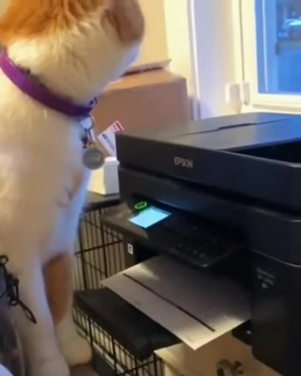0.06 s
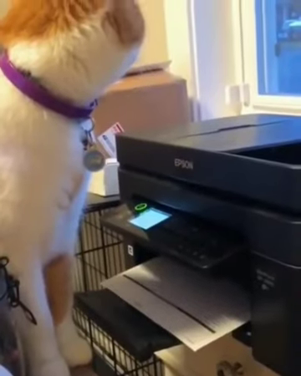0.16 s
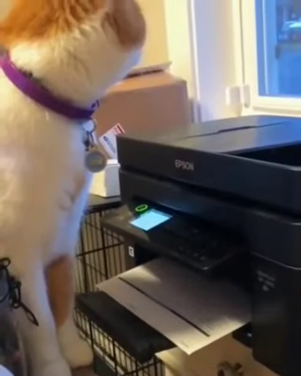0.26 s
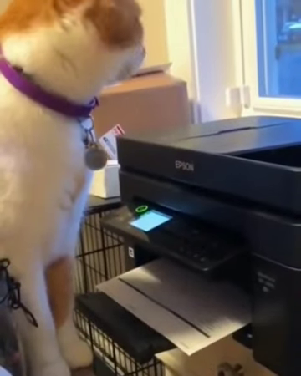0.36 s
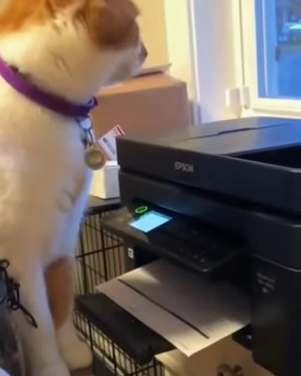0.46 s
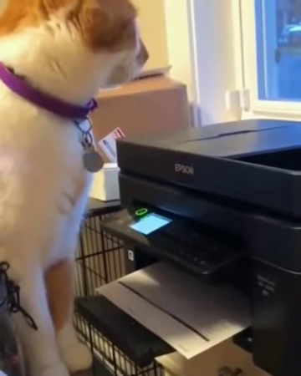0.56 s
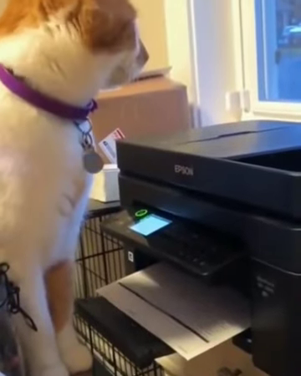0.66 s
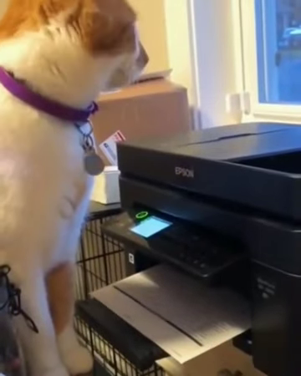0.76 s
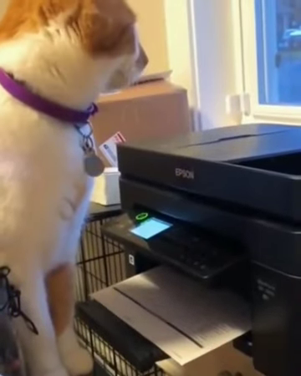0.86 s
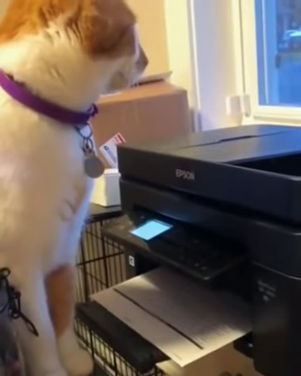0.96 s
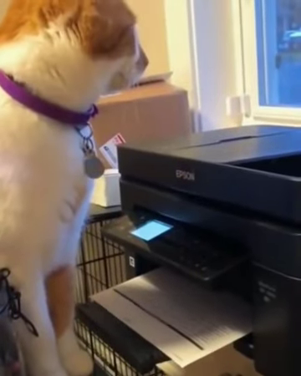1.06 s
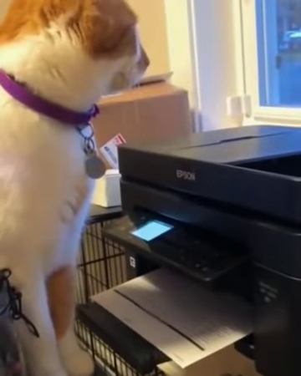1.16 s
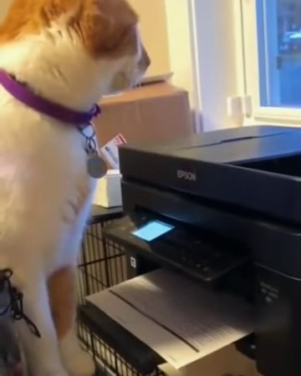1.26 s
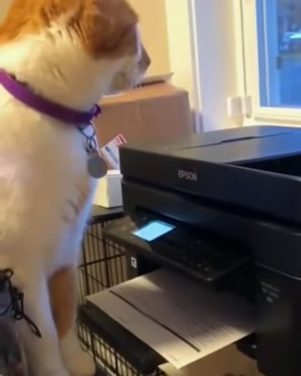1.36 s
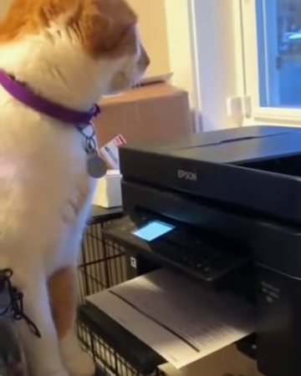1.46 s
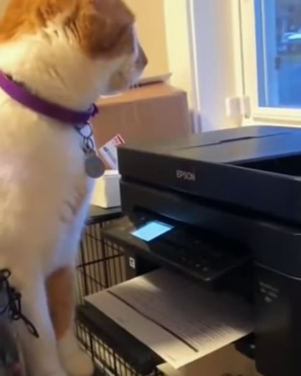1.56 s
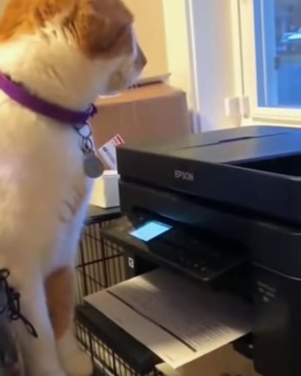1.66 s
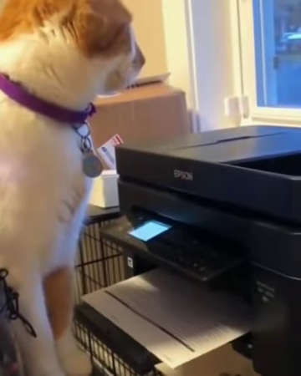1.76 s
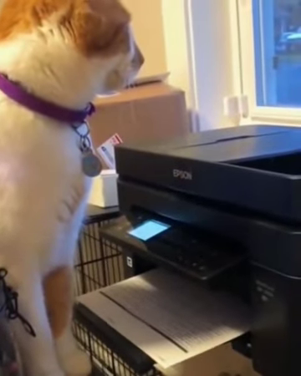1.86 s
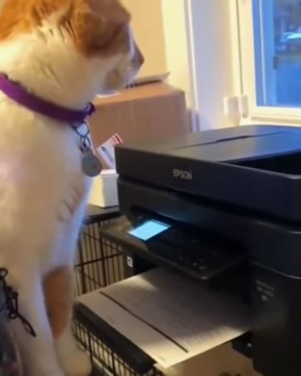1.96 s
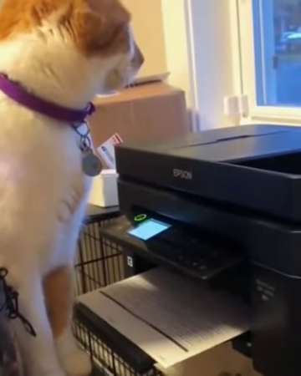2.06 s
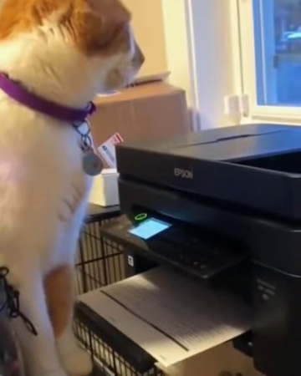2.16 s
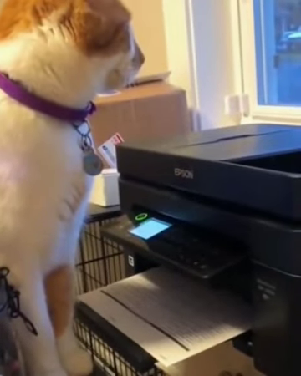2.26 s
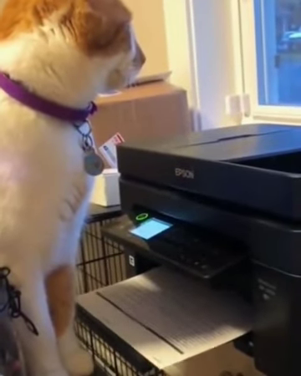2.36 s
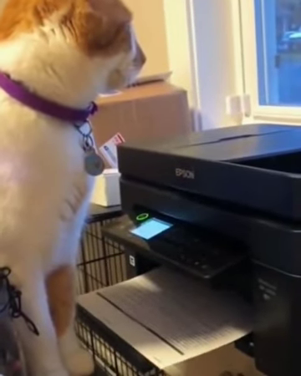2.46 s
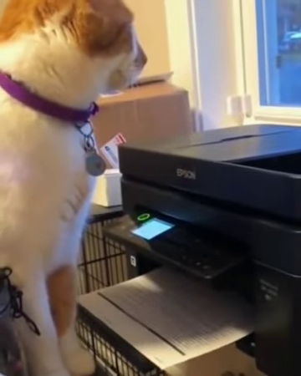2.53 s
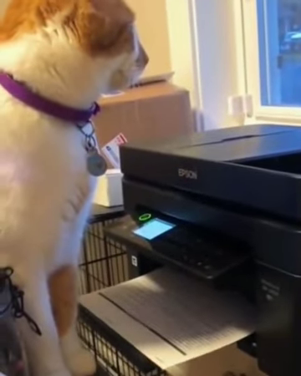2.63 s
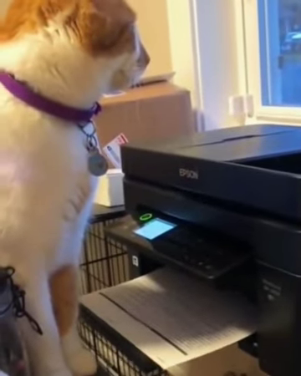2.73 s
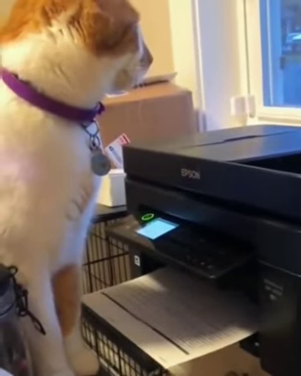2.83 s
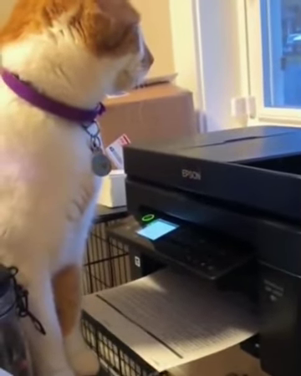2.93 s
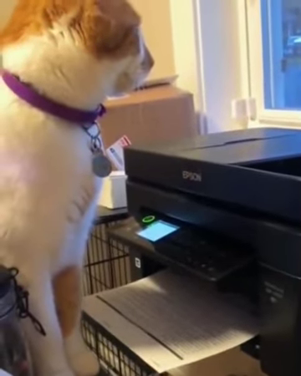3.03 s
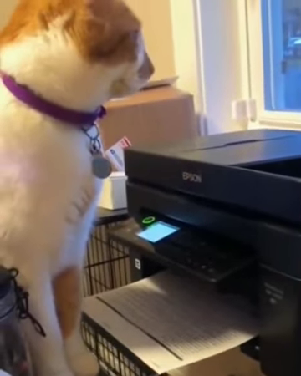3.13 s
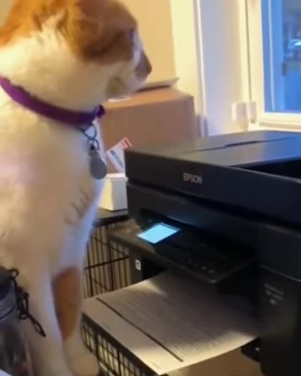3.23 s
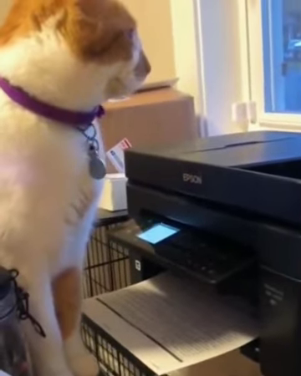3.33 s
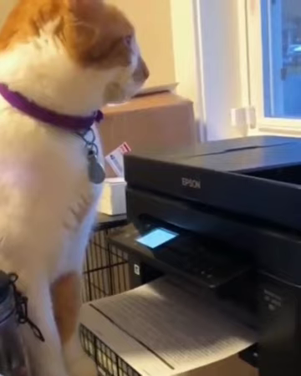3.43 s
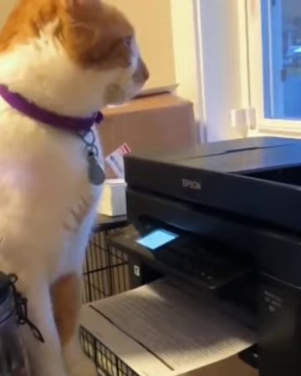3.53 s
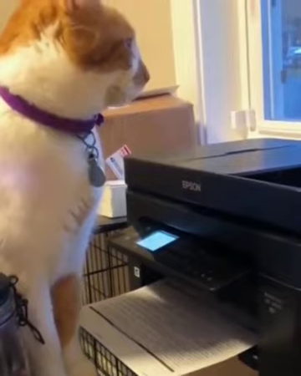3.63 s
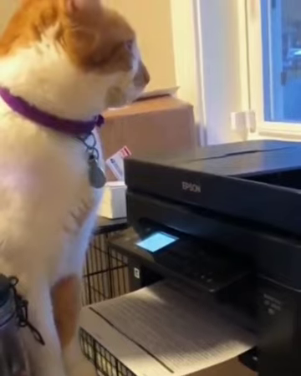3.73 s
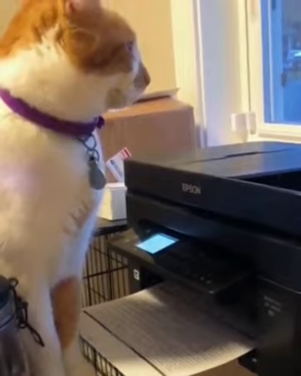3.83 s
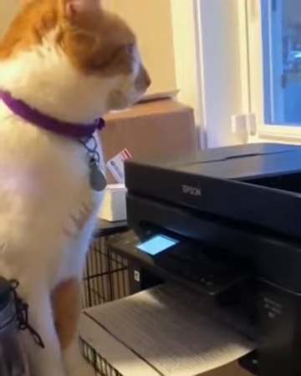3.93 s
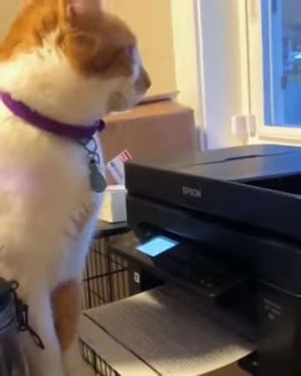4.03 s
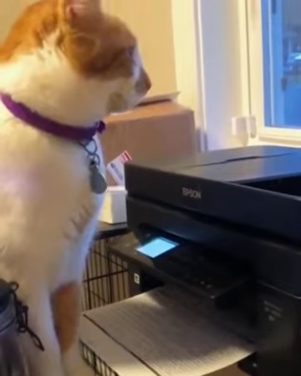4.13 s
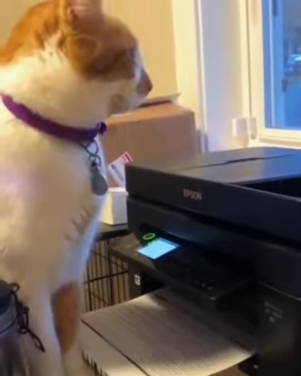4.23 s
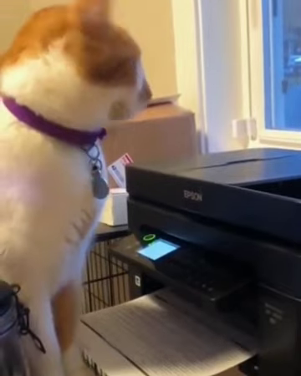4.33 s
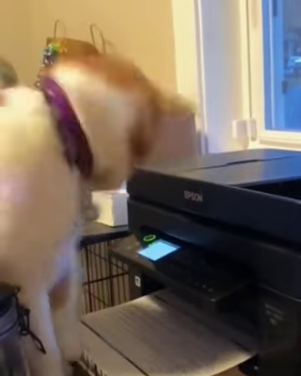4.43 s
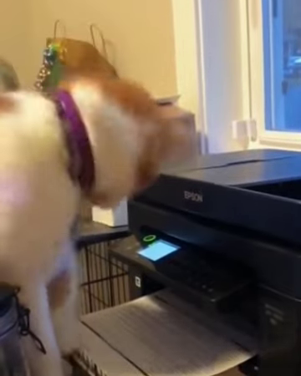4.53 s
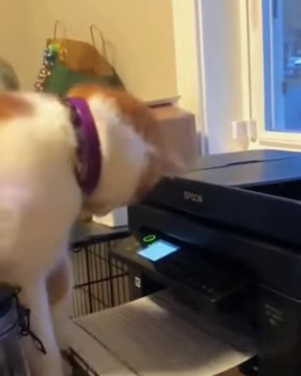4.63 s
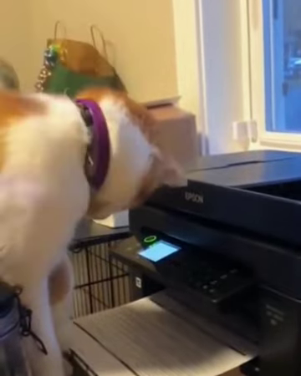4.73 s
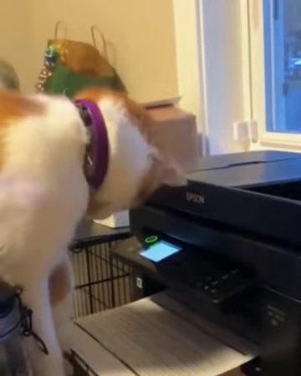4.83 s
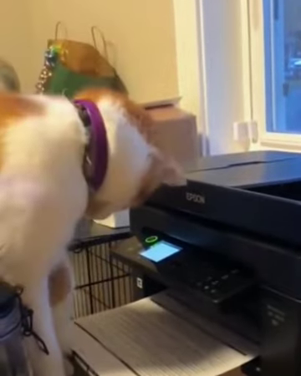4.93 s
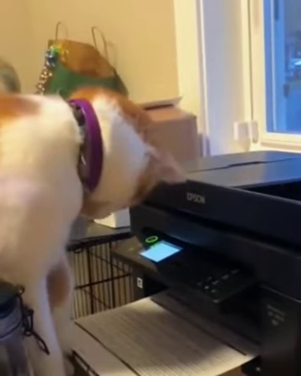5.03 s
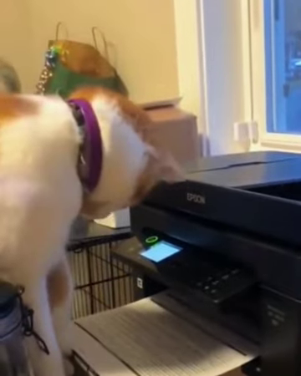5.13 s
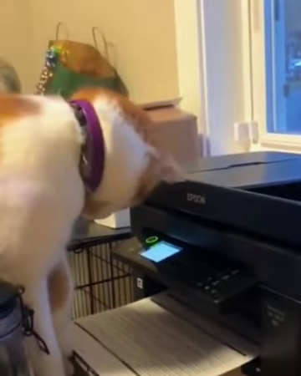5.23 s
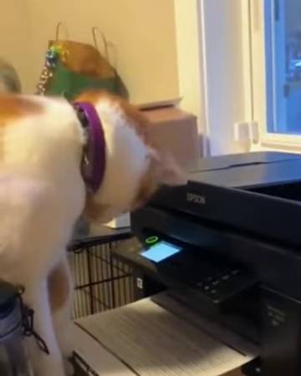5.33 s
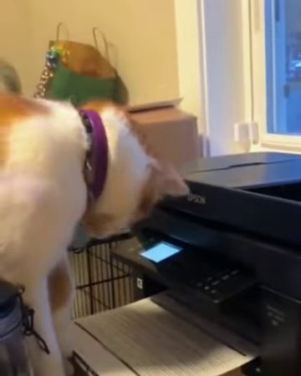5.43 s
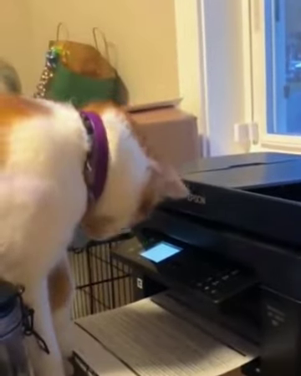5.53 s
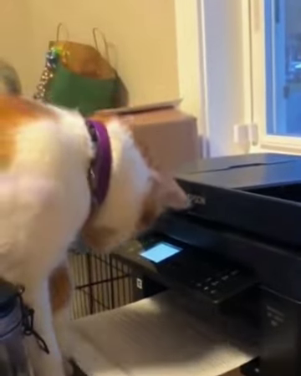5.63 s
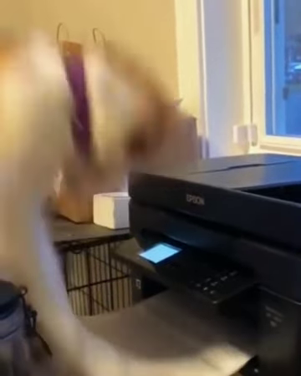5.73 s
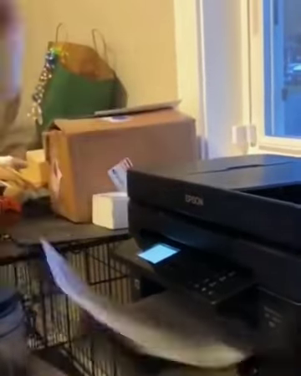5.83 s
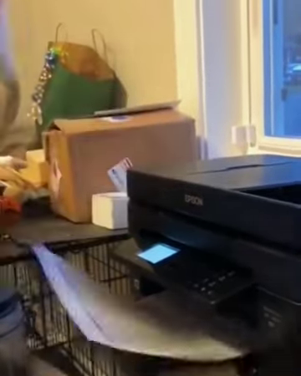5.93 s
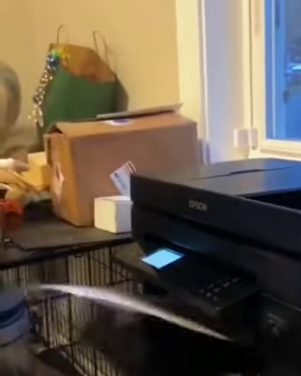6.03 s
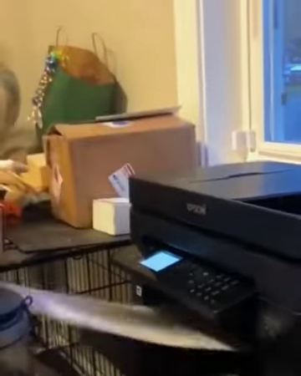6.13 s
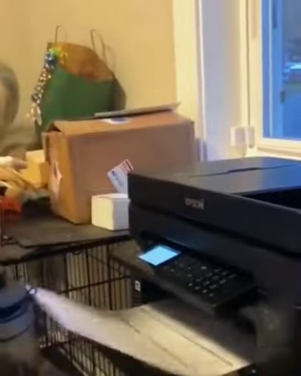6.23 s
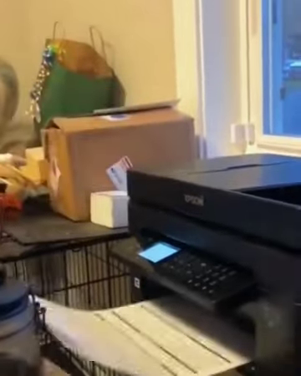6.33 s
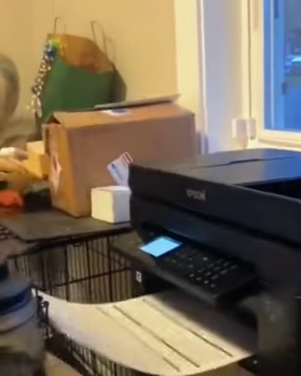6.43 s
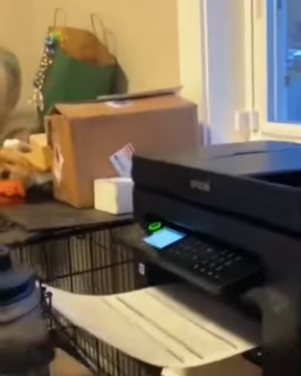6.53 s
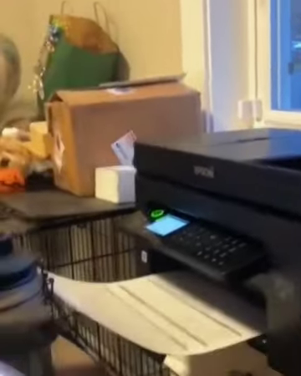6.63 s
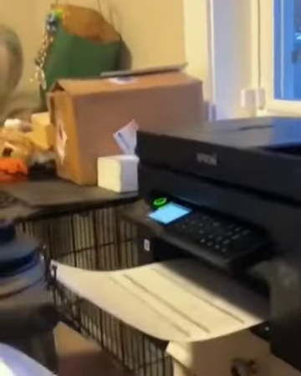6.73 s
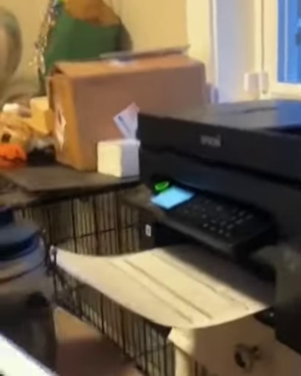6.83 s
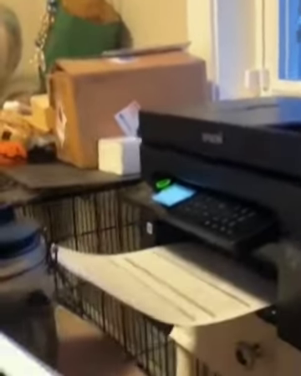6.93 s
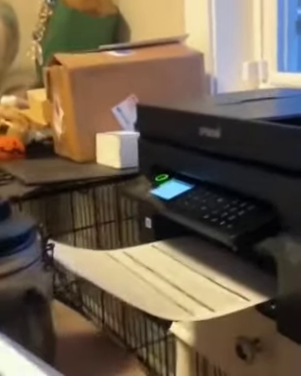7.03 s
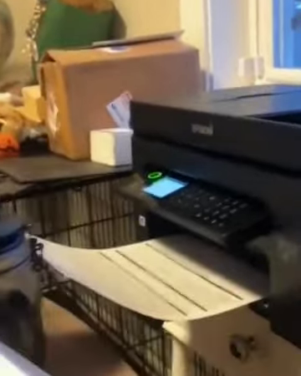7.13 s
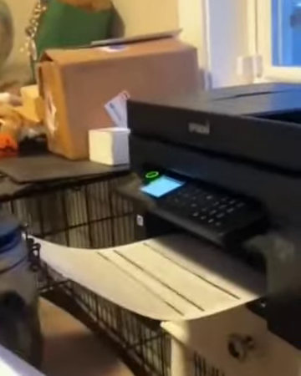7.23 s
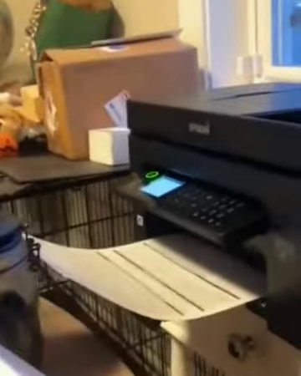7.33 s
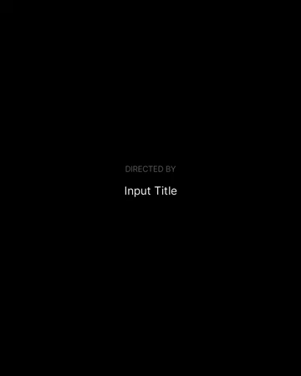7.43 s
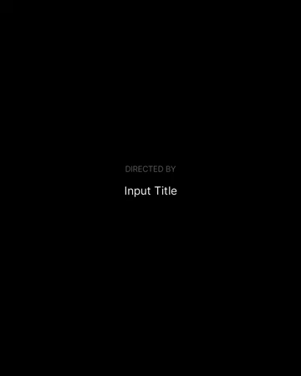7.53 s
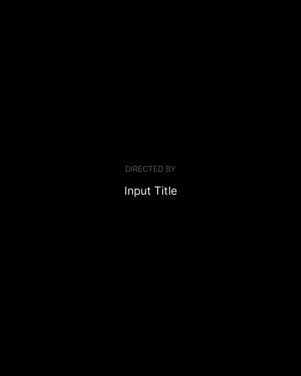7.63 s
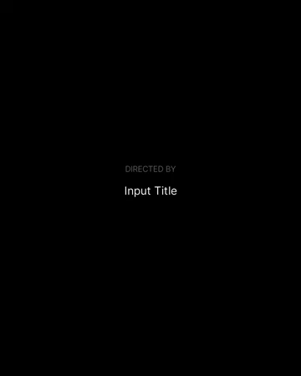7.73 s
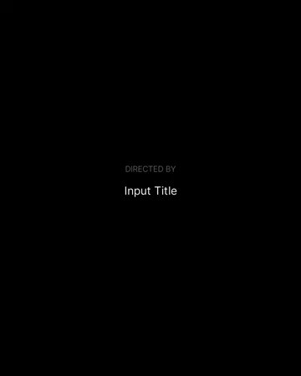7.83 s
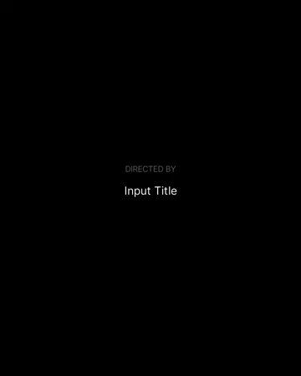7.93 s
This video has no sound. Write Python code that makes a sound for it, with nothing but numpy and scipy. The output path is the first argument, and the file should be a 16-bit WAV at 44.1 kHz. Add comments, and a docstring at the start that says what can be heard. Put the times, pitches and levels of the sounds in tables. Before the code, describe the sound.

Close up in a small quiet room, an inkjet printer works: short thin belt whines sweep out and back over a soft rush, each ending in a gear click and page jerk. After about five seconds it runs down and pauses. A brief motor hum starts the eject, then a cat jumping off knocks the tray: sharp cracks, hollow booms, rattling plastic and rustling paper, until the sound stops dead.

```python
"""First comes a belt whine: an inkjet printer at work in a quiet room, gear clicks and page jerks ending its sweeps.
It pauses and starts to eject; a cat leaps off, knocking the tray, and plastic, paper and small metal parts clatter.
Whine, hum and small metal parts are wavering sines; rush, jerks, knocks and rattle are noise through spectra or resonances.
The room answers the jerks and knocks 5.5 dB down. The microphone loses the top octave's edge;
the level drops four times, the treble goes dull twice, and the sound is cut off at the end."""
import sys
import numpy as np
from scipy import signal
from scipy.fft import rfft, irfft, next_fast_len
from scipy.io import wavfile
from scipy.ndimage import map_coordinates

SR = 44100
rng = np.random.default_rng(int(sys.argv[2]) if len(sys.argv) > 2 else 0)


def wav_record(signal):
    """Record a signal, one row per channel, as 16-bit PCM in the file named by sys.argv[1]."""
    frames = np.transpose(np.atleast_2d(signal))
    bounded = np.clip(frames, -1, 1)
    # unit amplitude maps onto the largest positive 16-bit level
    quanta = np.round(bounded * 32767).astype(np.int16)
    wavfile.write(sys.argv[1], SR, quanta)


N = 351853

# Levels are relative: the functions below trim the layers against each other.
# Resonances have pitch_hz, width_hz, level_db; noise spectra have pitch_hz, density_db (dB per Hz).

# --- tables: carriage and rollers
# steady stretches of the carriage, out and back by turns: start_s, length_s, whine_db
SWEEPS = [(0.038, 0.25, -41.5), (0.369, 0.13, -45), (0.608, 0.097, -39.5), (0.77, 0.12, -41),
          (1, 0.17, -41), (1.309, 0.14, -43), (1.557, 0.17, -40), (1.868, 0.14, -41.5), (2.103, 0.2, -43.5),
          (2.441, 0.14, -46), (2.659, 0.1, -40), (2.976, 0.15, -39.5), (3.191, 0.19, -43),
          (3.469, 0.068, -43), (3.633, 0.094, -41), (3.88, 0.12, -46), (4.085, .1, -47),
          (4.321, 0.084, -46), (4.517, 0.11, -47), (4.747, 0.087, -46.5), (4.93, 0.17, -47)]
# motor tones: multiple of the whine pitch, level_db
MOTOR_ORDERS = [(1 / 3, -9), (1, 0), (1.57, -13), (5, -20)]
# case around the belt, passed twice: pitch_hz, width_hz, level_db
BELT_CASE_MODES = [(1210, 150, 5), (1540, 270, 8)]
# rush of the sliding carriage: pitch_hz, density_db
RUSH_SPECTRUM = [(180, -29), (300, -8.5), (424, -10), (674, -6), (850, -9), (1000, -4), (1090, -7.5),
                 (1440, -9.5), (2070, -17.5), (4430, -17), (9970, -27.5), (13000, -24.5), (15600, -44.5)]
# the stand humming along: pitch_hz, width_hz, level_db
DRONE_MODES = [(103.5, 23.5, 0.5), (154, 45, -1.5), (231, 10, 6.5), (315, 57, -7.5)]
# jerks of the rollers: start_s, click_db, click_pitch_hz, case_ring_db, scrape_db, thump_db
FEEDS = [(0.215, -21, 3140, -29.5, -28, -37), (0.5008, -24.5, 3260, -43.5, -63, -33),
         (0.8892, -39, 1920, -44.5, -43, -34.5), (1.163, -27, 2760, -31.5, -31.5, -39.5),
         (1.4425, -32, 1910, -48, -63, -35.5), (1.7169, -27, 3350, -31.5, -29, -38.5),
         (1.999, -34.5, 2480, -43.5, -47, -41), (2.2709, -22, 3270, -29.5, -26.5, -36),
         (2.5565, -28, 3200, -39, -64, -35.5), (2.7412, -32, 5060, -60, -33, -45),
         (2.82, -19.5, 3310, -30.5, -31.5, -35), (3.2908, -25.5, 1900, -67, -35, -40),
         (3.3714, -43, 1900, -29.5, -28.5, -33.5), (3.5357, -35, 2770, -41.5, -47, -36.5),
         (3.7469, -20.5, 3050, -30.5, -30.5, -35.5), (3.9761, -24.5, 2200, -40.5, -48, -38.5),
         (4.1839, -22.5, 2730, -28, -33.5, -37), (4.4057, -25.5, 2530, -39.5, -40.5, -35.5),
         (4.4446, -36.5, 2520, -48.5, -60, -60), (4.487, -42, 5530, -60, -39, -50),
         (4.6098, -18, 2330, -29, -45, -37), (4.8314, -25.5, 2770, -38.5, -43, -37)]
# gear that clicks: pitch_hz, width_hz, level_db
GEAR_MODES = [(1570, 480, -1.5), (2570, 440, 0), (3000, 100, 5.5), (3310, 190, 2), (4680, 810, -3.5),
              (8700, 6000, -17.5)]
# printer case: pitch_hz, width_hz, level_db
CASE_MODES = [(553.4, 88, 7.5), (1070, 39, -8.5), (1740, 114, -11.5)]
# stand under the printer: pitch_hz, width_hz, level_db
STAND_MODES = [(152, 27, -1), (237.4, 96, -4.5)]
# paper on the rollers: pitch_hz, density_db
SCRAPE_SPECTRUM = [(530, -49), (900, -9), (1050, 3), (1200, -6.5), (1730, -5), (1910, -9), (8780, -39),
                   (12900, -32), (15600, -39.5)]
# roller motor at the eject: time_s, level_db
EJECT_LEVELS = [(5.625, -33.5), (5.641, -23.5), (5.793, -22.5), (5.8, -28)]

# --- tables: knocks and clatter
# blows: start_s, crack_db, low_db, mid_db, mid_pitch_hz
KNOCKS = [(5.6145, -23, -39, -28.5, 776), (5.7009, -30, -19, -33, 760), (5.7112, -6, -51, -31, 750),
          (5.7291, -12, -20, -26, 770), (5.7598, -30, -10, -23, 820), (5.7905, 2, -8.5, -20, 517),
          (5.8494, -5.5, -19, -13.5, 583), (5.8876, -6, -35, -12.5, 1180), (5.9481, 0, -31, -12, 1230),
          (6.0147, 0, -21, -15.5, 950), (6.0881, -0.5, -13, -10, 1100), (6.176, -2, -10.5, -6.5, 555),
          (6.1971, -1, -12.5, -10, 1140), (6.244, -2.5, -13.5, -7, 1820), (6.2889, -7.5, -23, -13.5, 501),
          (6.351, -4.5, -11, -8.5, 820), (6.3589, -19.5, -12, -17.5, 910), (6.4186, -10, -13.5, -10.5, 610),
          (6.4446, -11.5, -12.5, -13.5, 1590), (6.5203, -7.5, -7, -6, 538), (6.575, -11, -15.5, -20, 1360),
          (6.629, -18, -12.5, -13.5, 513), (6.6544, -13.5, -13, -14.5, 514), (6.8201, -17, -19, -12, 854),
          (6.9094, -23, -18.5, -14.5, 564), (6.9257, -0.5, -17.5, -6.5, 1240), (6.9441, -15, -14, -12, 786),
          (6.9895, -13, -12.5, -11, 630), (7.0532, -6, -21.5, -4, 874), (7.0796, -19, -31, -16, 810),
          (7.2278, -29, -41.5, -21, 1460), (7.2534, -14.5, -31.5, -15, 1650)]
# hard plastic edges: pitch_hz, width_hz, level_db
CRACK_MODES = [(2300, 600, -1.5), (3300, 780, -1.5), (5450, 860, -5.5)]
# low tray resonances: pitch_hz, width_hz, level_db
TRAY_MODES = [(154, 10, -6), (204, 23, -3.5), (264, 33, 3.5), (368, 45, 3)]
# loose clatter: time_s, plastic_db, paper_db over plastic, tray_db over plastic, fine_rustle_db over paper
CLATTER = [(5.612, -28.5, -6.5, 1.5, -18), (5.692, -27.5, -4.5, 0, -9), (5.716, -26, 0, -4, -33),
           (5.77, -23, -1.5, 0, -14), (5.806, -15, 1.5, -6.5, -5), (5.914, -17, 7, 0, 0),
           (6.0, -20, 4, -5, -3), (6.096, -14, -4, 1.5, 2), (6.2, -18, 2.5, 2, -7),
           (6.4, -17.5, -8.5, 0.5, -7), (6.5, -18, -3.5, 1.5, -9), (6.614, -18, -8, -1.5, -9),
           (6.666, -27, 5, 2, -10), (6.764, -25, -3.5, 1, 1), (6.84, -20, -5.5, -14.5, -12),
           (6.96, -16, -7.5, -20.5, -14), (7.032, -22, -2.5, -7, -15.5), (7.154, -27, -3, -7, -10.5),
           (7.25, -24, -6.5, -22.5, -6)]
# booming tray: pitch_hz, density_db
BOOM_SPECTRUM = [(24, -53.5), (40, -23), (91, -1), (173, 1), (204, 1.5), (268, -4.5), (484, -3.5),
                 (600, -1), (780, -36.5), (1320, -120)]
# rattling plastic: pitch_hz, density_db
PLASTIC_SPECTRUM = [(240, -33.5), (400, -5), (483, -3), (547, 0), (1110, -1.5), (1380, -5), (2040, -10),
                    (2600, -18.5), (3380, -41.5), (5720, -120)]
# paper, also the sharp front of a knock: pitch_hz, density_db
PAPER_SPECTRUM = [(1180, -25.5), (2000, -4), (2610, -3.5), (2940, -1), (3210, -3.5), (4880, -2),
                  (6650, -5.5), (13200, -18), (15600, -24.5)]
# fine rustle: pitch_hz, density_db
RUSTLE_SPECTRUM = [(5500, -27), (8000, -8), (13800, -1.5), (14600, -13), (15700, -21)]
# two small metal parts, the jingling one and the squealing one: pitch_hz
METAL_HZ = [14298, 5540]
# the lower metal part: time_s, level_db
SQUEAL_LEVELS = [(6.66, -39), (6.8, -48), (6.82, -41), (6.9, -44.5), (7.0, -27.5), (7.06, -32.5),
                 (7.22, -49), (7.25, -40.5), (7.27, -40.5)]
# brief tones: start_s, length_s, pitch_hz, width_hz (of each of two passes), level_db
BRIEF_TONES = [(0.256, 0.04, 4700, 400, -42), (4.49, 0.068, 5620, 400, -48), (6.317, 0.02, 6400, 200, -28),
               (4.44, .012, 790, 250, -31), (0.887, .03, 820, 820, -39), (6.52, 0.052, 317, 60, -19),
               (6.606, 0.055, 303, 32, -16), (6.62, 0.074, 440, 25, -17.5), (6.676, 0.088, 560, 30, -21.5),
               (6.923, 0.0614, 250, 25, -16.5), (6.964, 0.079, 210, 30, -15.5),
               (6.964, 0.053, 640, 30, -20), (7.051, 0.076, 720, 46, -17), (7.052, .06, 960, 120, -16.5),
               (6.352, 0.043, 900, 60, -16), (6.925, 0.04, 1230, 88, -18.5), (1.438, .015, 1930, 150, -46),
               (7.095, .13, 205, 20, -32.5)]

# --- tables: room and microphone
# decay of the room's answer: pitch_hz, t60_s
WALLS = [(200, 0.38), (2000, 0.33), (12000, 0.19)]
# room noise: pitch_hz, density_db
AIR_SPECTRUM = [(20, -16.5), (45, -6.5), (70, -14.5), (105, -1.5), (135, -2), (200, -12), (320, -16),
                (600, -26.5), (900, -21.5), (2000, -37.5), (6000, -44.5), (11500, -47), (13000, -35),
                (15700, -40.5)]
# low hum in the room: pitch_hz, level_db
HUM = [(43.1, -53)]
# brief drops in level: start_s, depth_db, hold_s, return_s
DIPS = [(0.725, -22, 0.018, 0.039), (1.121, -13, 0.0018, 0.02), (3.423, -20, 0.018, 0.04),
        (3.602, -8, 0.0019, 0.041)]
# stretches without treble: start_s, end_s
DULL_SPANS = [(.765, 1.1), (3.465, 3.59)]
# cut at the end: time_s, gain_db
CUT = [(0, -0.5), (7.262, -0.5), (7.272, -24.5), (7.3, -31.5), (7.315, -94), (7.33, -140)]
# microphone response, the top rolling off: pitch_hz, gain_db
MIC_RESPONSE = [(20, -1), (14300, -0.5), (14900, -8), (15700, -19.5)]


def carriage():
    """The belt buzzes in the case, over the rush of the slide and the drone of the stand; each jerk stirs all three."""
    lead_s, coast_s = (0.026, 0.1), (0.045, 0.0044)  # moves before and after the whine: (out, back)
    ease_s = 0.096
    moving = [(s - lead_s[k % 2], s + length + coast_s[k % 2]) for k, (s, length, _) in enumerate(SWEEPS)]
    going, coming = spans(moving[::2], ease_s), spans(moving[1::2], ease_s)
    motor_on = spans([(-1, 5.07)], 0.073) ** 2  # stops at 5.07 s, running down

    s, _, _, ring_db, scrape_db, thump_db = np.transpose(FEEDS)
    page_drag = ringdown(s, scrape_db - 11.5, t60=0.28)
    rush = motor_on * (amp(-54.5) + amp(-48) * going + amp(-47.5) * coming + page_drag)
    buzz = motor_on * (amp(-51) * going + ringdown(s, ring_db - 13.5, t60=0.49))
    drone = motor_on * amp(-46.5) + ringdown(s, thump_db - 10, t60=0.41)

    teeth = unit(filtered(rng.standard_normal(N), lambda f: modes(BELT_CASE_MODES)(f) ** 2))
    lumpy = amp(2.0 * wobble(16)) * rng.standard_normal(N)
    stand = unit(filtered(lumpy, lambda f: modes(DRONE_MODES)(f) * f / (f + 60j)))  # low cut at 60 Hz
    slide = hiss(RUSH_SPECTRUM, lumpy_db=1.5, rate=33)
    return rush * slide + drone * stand + buzz * teeth + whine()


def whine():
    """In each sweep the motor climbs to speed, sings loudest just after, then eases off."""
    whine_hz, ramp_s = 1012, 0.014
    out = np.zeros(N + SR)
    for s, length, db in SWEEPS:
        t = np.arange(round(length * SR)) / SR
        # phase of a pitch that starts 13% slow and sags 10% at the end
        late = 0.13 * ramp_s * np.exp(-t / ramp_s)
        sag = 0.1 * ramp_s * np.exp((t - length) / ramp_s)
        turn = 2 * np.pi * whine_hz * (t + late - sag)
        peak_db = 7.5 * np.exp(-((t - 0.055) / 0.017) ** 2)
        swell = amp(-8.0 + peak_db) * np.sin(np.pi * t / length) ** 0.2

        def waver(rate):
            """Random straight lines between 12 knots, rate knots a second."""
            return np.interp(t, np.arange(12) / rate, rng.standard_normal(12))

        tones = sum(amp(level + 2.9 * waver(42)) * np.sin(k * (turn + 0.28 * waver(49.0)))
                    for k, level in MOTOR_ORDERS)
        out[round(s * SR):][:len(t)] += amp(db) * np.sqrt(2) * swell * tones
    return out[:N]


def rollers():
    """A gear clicks, then the page jerks: the push swells and rings case and stand."""
    out, t = np.zeros(N + SR), np.arange(SR // 4) / SR
    for s, click_db, click_hz, ring_db, scrape_db, thump_db in FEEDS:
        swell_s = 0.026 if ring_db > -33 else 0.014  # a heavy jerk swells slower
        u = t / swell_s
        push = 0.25 * np.exp(-u) + u ** 2 * np.exp(1 - u ** 1.58)
        snap = amp(-60 * t / 0.036) * (1 - np.exp(-(t / 0.0026) ** 2))
        tooth = modes([(click_hz, 340, 0), (0.43 * click_hz, 130, 1.5)])  # the tooth that lets go rings on
        jerk = amp(click_db - 5.0) * burst(snap, modes(GEAR_MODES))
        jerk += amp(click_db - 1.5) * burst(snap ** 1.11, tooth)
        jerk += amp(ring_db) * burst(push ** 0.69, modes(CASE_MODES))
        jerk += amp(thump_db) * burst(push ** 0.36, modes(STAND_MODES))
        jerk += amp(scrape_db - 9) * burst(push, lambda hz: amp(along(SCRAPE_SPECTRUM, hz)))
        out[round(s * SR):][:len(t)] += jerk
    return out[:N]


def eject():
    """The roller motor hums one slightly unsteady tone."""
    turn = 2 * np.pi * 790 * np.arange(N) / SR + 0.49 * wobble(50)
    return gains(EJECT_LEVELS)[0] * amp(1.5 * wobble(70)) * np.sqrt(2) * np.sin(turn)


def knocks():
    """Each blow cracks, rings the struck part at its own pitches and booms the tray."""
    out, t = np.zeros(N + SR), np.arange(SR // 4) / SR

    def fall(stretch):
        """A quick rise, then 60 dB down in stretch times 0.12 s."""
        return amp(-60 * t / (stretch * 0.12)) * (1 - np.exp(-t / 0.00081))

    for s, crack_db, low_db, mid_db, mid_hz in KNOCKS:
        part = modes([(mid_hz, 90, 0), (1.77 * mid_hz, 500, -9)])
        blow = amp(crack_db - 7) * burst(fall(0.36), lambda f: amp(along(PAPER_SPECTRUM, f)))
        blow += amp(crack_db - 13.0) * burst(fall(0.4), modes(CRACK_MODES))
        blow += amp(mid_db - 2.5) * burst(fall(1.07), part)
        blow += amp(low_db - 2.0) * burst(fall(1.27), modes(TRAY_MODES))
        out[round(s * SR):][:len(t)] += blow
    return out[:N]


def clatter():
    """Dense small contacts of tray, plastic and paper; two metal parts keep ringing."""
    loose_plastic, sheet, tray, fine = gains(CLATTER)
    loose_paper, loose_boom = loose_plastic * sheet, loose_plastic * tray
    s, crack_db, low_db, mid_db, _ = np.transpose(KNOCKS)
    rustle = fine * loose_paper + ringdown(s, crack_db - 22, t60=0.22)  # a crack stirs the rustle

    def settling(loose, kick_db):
        """Loose clatter plus the rattle that each knock leaves behind."""
        return amp(-2) * loose + ringdown(s, kick_db, t60=0.33)

    plastic = settling(loose_plastic, mid_db - 13.5)
    paper = settling(loose_paper, crack_db - 19)
    boom = settling(loose_boom, low_db - 13.5)

    t = np.arange(N) / SR
    jingle = amp(-21.5) * rustle
    metal = sum(level * amp(3.5 + 2.9 * wobble(32)) * np.sin(2 * np.pi * hz * t + 0.6 * wobble(30))
                for hz, level in zip(METAL_HZ, [jingle, gains(SQUEAL_LEVELS)[0]]))
    snaps = amp(-9) * crackle(count=1500, spread_db=1.0, cycles=9)
    snaps += amp(-8) * crackle(count=250, spread_db=2.5, cycles=40)

    out = amp(-4) * boom * hiss(BOOM_SPECTRUM, lumpy_db=1.0, rate=36)
    out += amp(-1.0) * plastic * hiss(PLASTIC_SPECTRUM, lumpy_db=2.5, rate=45)
    out += paper * (amp(-4.5) * hiss(PAPER_SPECTRUM, lumpy_db=0.0, rate=91) + snaps)
    out += amp(-8.0) * rustle * hiss(RUSTLE_SPECTRUM, lumpy_db=2.0, rate=120)
    return out + metal


def crackle(count, spread_db, cycles):
    """Tiny snaps of creased paper and plastic: short damped tones of random pitch and size."""
    at, pitch, size = rng.random((count, 3)).T
    t = np.arange(900) / SR
    hz = 1500 * 6.5 ** pitch[:, None]
    level = amp(-spread_db * np.log(size + 0.011))[:, None]
    snaps = level * np.sin(2 * np.pi * hz * t) * np.exp(-hz * t / cycles)
    where = ((5.6 + 1.7 * at[:, None]) * SR).astype(int) + np.arange(len(t))  # 5.6 to 7.3 s
    out = np.bincount(where.ravel(), snaps.ravel(), N)
    return out / np.sqrt(np.mean(out[out != 0] ** 2))


def brief_tones():
    """A brief tone, swelling and fading: noise through one resonance, twice."""
    out = np.zeros(N + SR)
    for s, length, hz, width, db in BRIEF_TONES:
        shape = np.sin(np.linspace(0, np.pi, round(length * SR))) ** 0.58
        out[round(s * SR):][:len(shape)] += amp(db) * burst(shape, lambda f: modes([(hz, width, 0)])(f) ** 2)
    return out[:N]


def room(x):
    """Each frequency of the room's answer dies at its own speed."""
    hz, t, z = signal.stft(rng.standard_normal(SR // 2), SR, nperseg=256)
    decay = amp(-60 * t / along(WALLS, hz)[:, None])
    tail = signal.istft(z * decay, SR, nperseg=256)[1]
    delayed = np.pad(x, (300, 0))  # 7 ms before the walls answer
    return signal.fftconvolve(delayed, tail / np.linalg.norm(tail))[:N]


def air():
    """The room's own noise and a wavering low hum."""
    t = np.arange(N) / SR
    hum = sum(amp(db + 2.5 + 1.5 * wobble(2.9)) * np.sin(2 * np.pi * hz * t + 0.9 * wobble(7.6))
              for hz, db in HUM)
    return amp(-43.5) * hiss(AIR_SPECTRUM, lumpy_db=0.6, rate=11) + hum


def amp(db):
    """Decibels to a linear gain."""
    return 10 ** (np.asarray(db) / 20)


def unit(x):
    """x scaled to rms 1."""
    return x / np.sqrt(np.mean(x ** 2) + 1e-20)


def along(points, hz):
    """Value at hz of (pitch_hz, value) points on a log frequency axis."""
    f, v = np.transpose(points)
    return np.interp(np.log(hz + 1), np.log(f + 1), v)


def gains(rows):
    """One gain per sample for each dB column, silent outside the table."""
    s, *columns = np.transpose(rows)
    t = np.arange(N) / SR
    return [amp(np.interp(t, s, c, left=-140, right=-140)) for c in columns]


def wobble(rate):
    """A smooth random curve, rate knots a second."""
    return map_coordinates(rng.standard_normal(int(N * rate / SR) + 4), [np.arange(N) * rate / SR])


def filtered(x, response):
    """x through a complex response of frequency."""
    m = next_fast_len(len(x) + 8192)  # zeros behind, so little wraps round
    return irfft(rfft(x, m) * response(np.fft.rfftfreq(m, 1 / SR)), m)[:len(x)]


def modes(table):
    """The causal response of a few resonances, with alternating signs."""
    def response(f):
        return sum((-1) ** k * amp(db) * 1j * f * w / (c * c - f * f + 1j * f * w)
                   for k, (c, w, db) in enumerate(table))
    return response


def hiss(spectrum, lumpy_db, rate):
    """Coloured noise of rms 1 whose level flutters."""
    noise = amp(lumpy_db * wobble(rate)) * rng.standard_normal(N)
    return unit(filtered(noise, lambda hz: amp(along(spectrum, hz))))


def burst(shape, response):
    """Noise under an envelope through a response, scaled to the envelope's energy."""
    x = filtered(shape * rng.standard_normal(len(shape)), response)
    return x * np.linalg.norm(shape) / np.linalg.norm(x)


def ringdown(times, db, t60):
    """A gain that jumps at each time and dies away, 60 dB in t60 seconds."""
    kicks = np.bincount((np.asarray(times) * SR).astype(int), amp(db) * np.ones(len(times)), N)
    return signal.lfilter([1], [1, -amp(-60 / (t60 * SR))], kicks)


def spans(rows, edge):
    """1 inside each (start, end), 0 outside, with ramps of edge seconds."""
    t = np.arange(N) / SR
    return np.clip(sum(np.clip(np.minimum(t - a, b - t) / edge + 0.5, 0, 1) for a, b in rows), 0, 1)


def scene():
    """Printer, knocks and clatter in front, the room's answer and its air behind."""
    hits = rollers() + knocks()
    near = hits + carriage() + eject() + brief_tones() + clatter()
    return (near + amp(-5.5) * room(hits) + air())[None]


def record(dry):
    """Peaks are squeezed, the treble and the level drop out now and then, nothing passes above the band limit."""
    dull_hz, top_hz, fall_s = 6600, 15725, 0.0071  # fall_s: how fast a level drop sets in
    t = np.arange(N) / SR
    x = dry[0] / (1 + np.abs(dry[0]) ** 4) ** (1 / 4)
    treble = filtered(x, lambda hz: hz > dull_hz)
    treble_gain = amp(-38 * spans(DULL_SPANS, edge=0.09))
    dips_db = sum(np.interp(t, [s - fall_s, s, s + hold, s + hold + back], [0, db, db, 0])
                  for s, db, hold, back in DIPS)
    x = (x - treble + treble_gain * treble) * amp(dips_db) * gains(CUT)[0]
    return filtered(x, lambda hz: amp(along(MIC_RESPONSE, hz)) * (hz < top_hz))[None]


dry = scene()
out = record(dry)
wav_record(out)
```